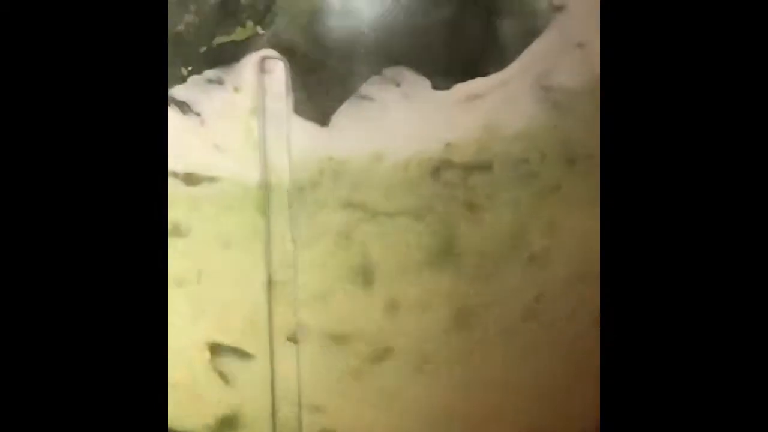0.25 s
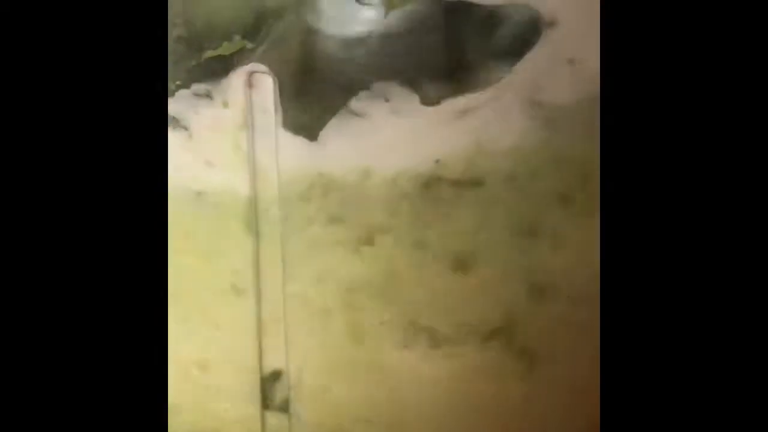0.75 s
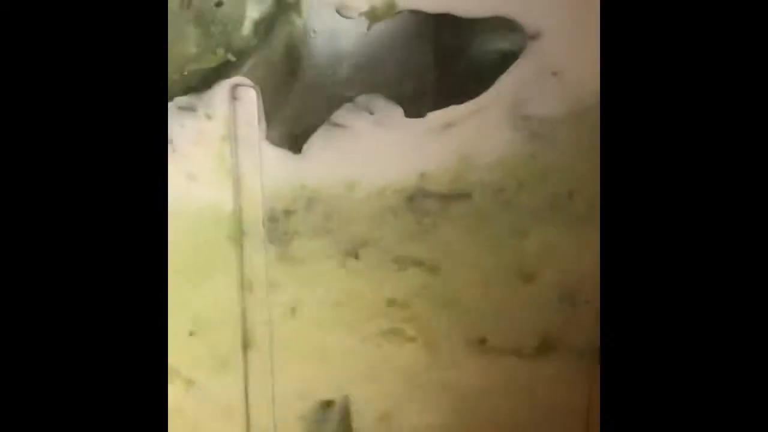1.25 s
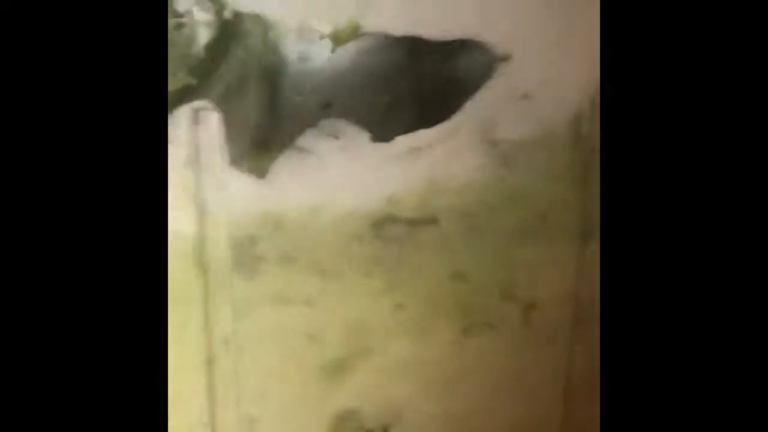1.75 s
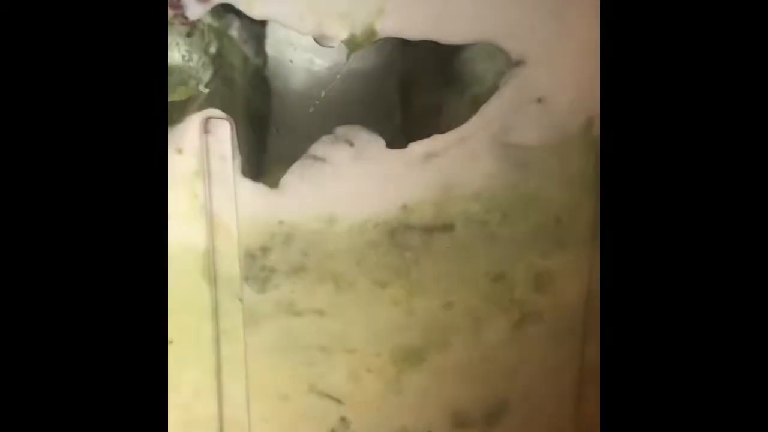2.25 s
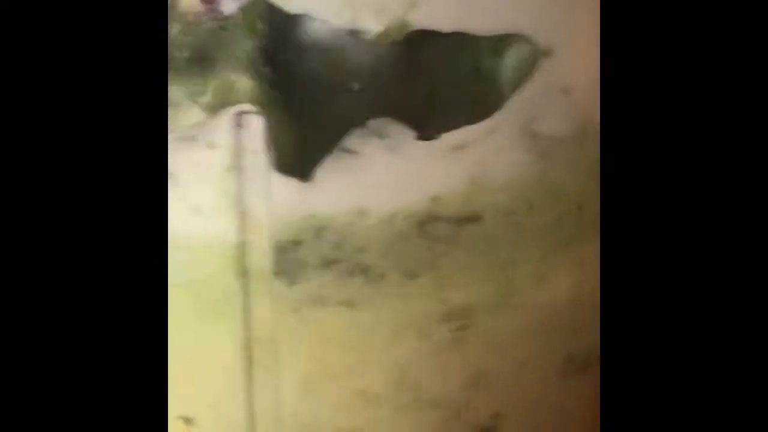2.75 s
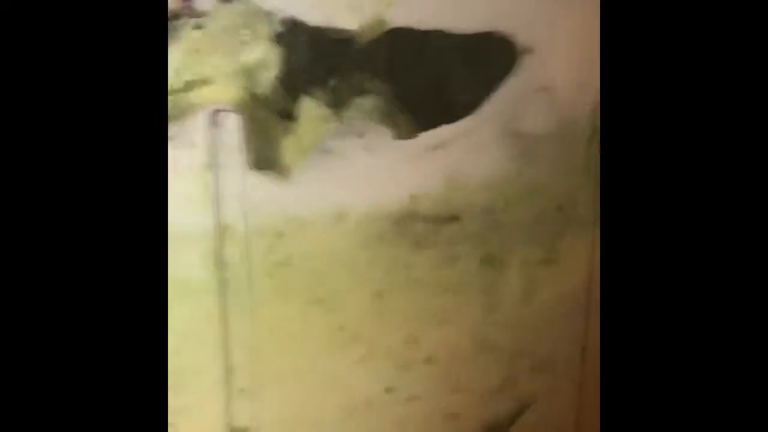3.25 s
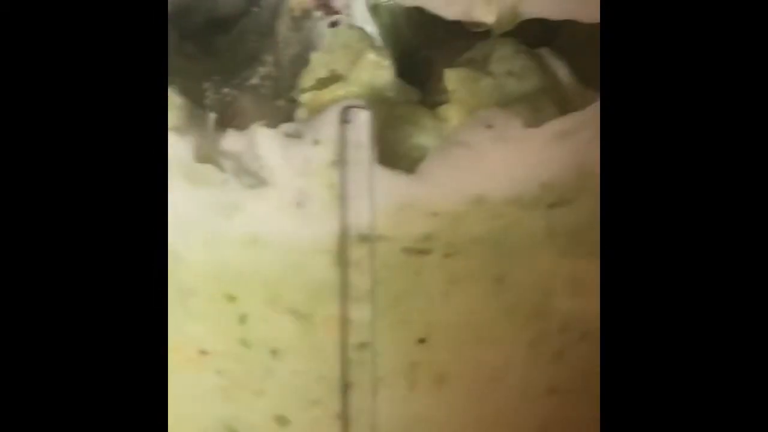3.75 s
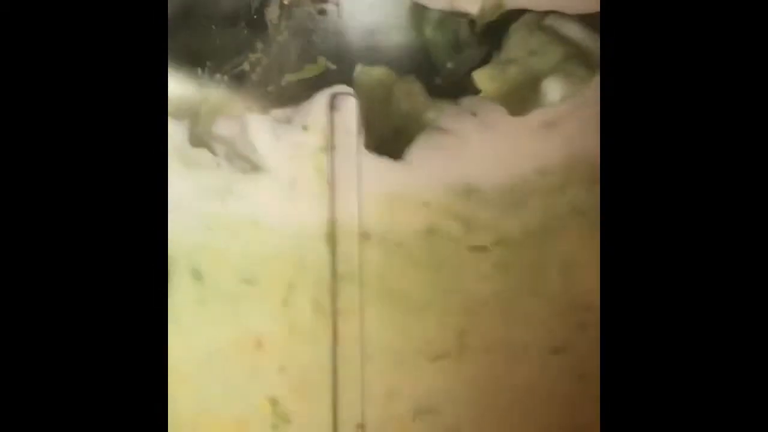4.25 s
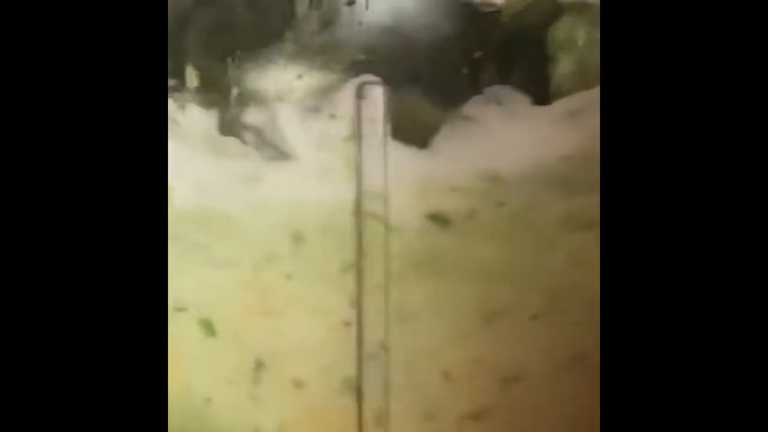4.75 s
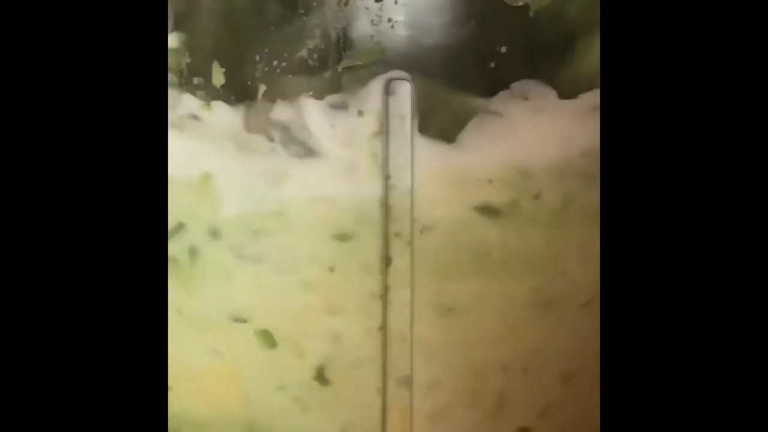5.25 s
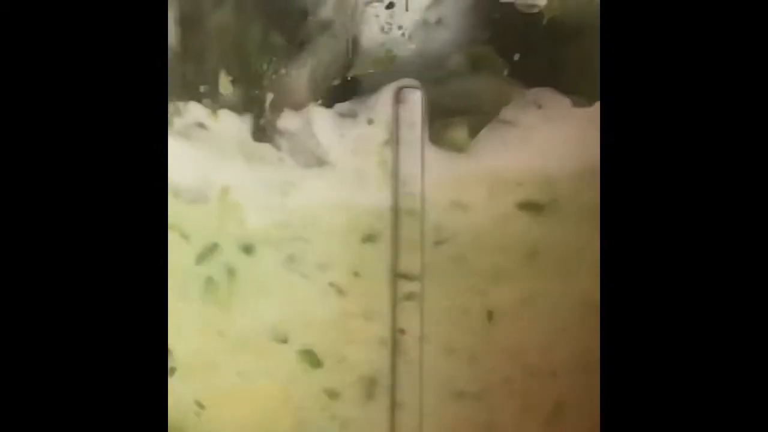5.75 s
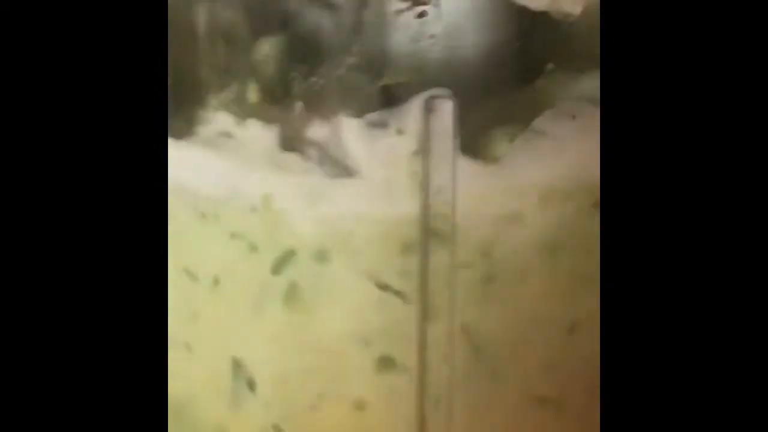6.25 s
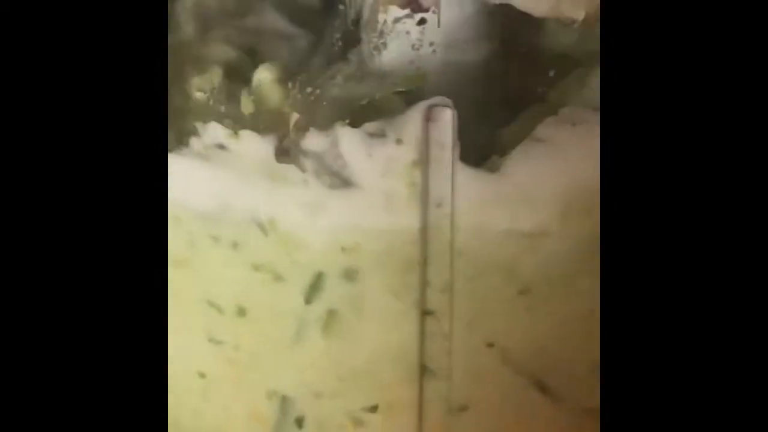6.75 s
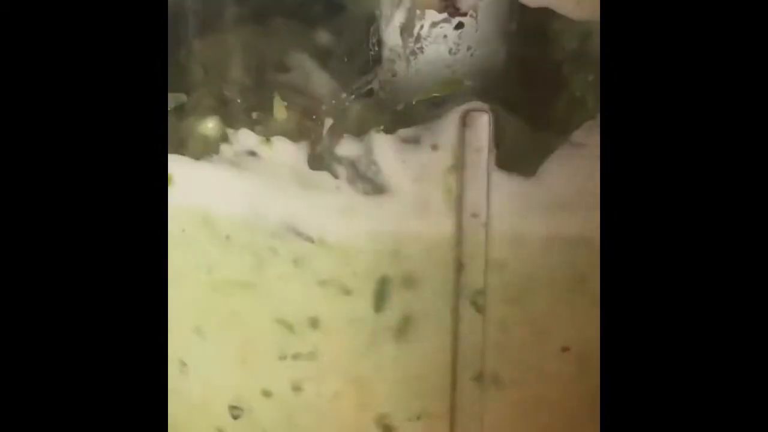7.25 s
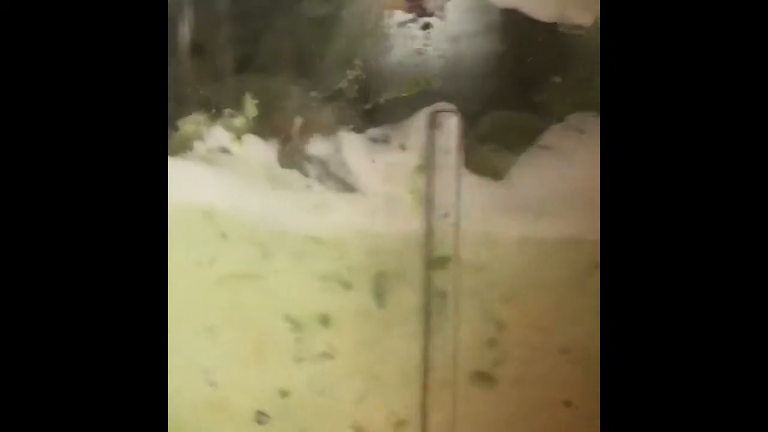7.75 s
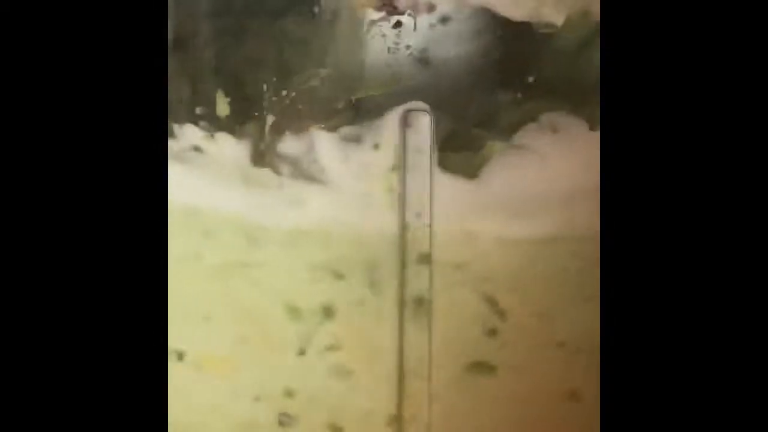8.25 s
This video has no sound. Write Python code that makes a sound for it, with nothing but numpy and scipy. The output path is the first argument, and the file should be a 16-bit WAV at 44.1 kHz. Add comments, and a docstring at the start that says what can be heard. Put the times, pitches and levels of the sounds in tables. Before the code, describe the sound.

Fast, hard plastic ratchet bursts from a pull-cord chopper repeat over wet sloshing puree, with knocks, bowl thumps and small ticks between pulls, close up.

```python
"""A hand-held pull-cord chopper whips a herb puree in a plastic bowl, close by in a kitchen.
It starts in mid-pull: a slowing run of hard ratchet clicks over a wet rush of food and a scraping cord.
As each surge ends the spool knocks, the bowl thumps and sometimes thuds on the counter; before the next
run come the clutch's double tick and the cord snapping taut. Stray bits of food tick later on, and
a faint low hum passes near the end. Filtered noise bursts make the contacts, noise and pops the food."""
import sys
import numpy as np
from scipy import signal
from scipy.fft import rfft, irfft
from scipy.io import wavfile

SR = 44100
rng = np.random.default_rng(int(sys.argv[2]) if len(sys.argv) > 2 else 0)


def unload_audio(sound):
    """Save the sound as a 16-bit wav file, at the path given as the first command line argument."""
    columns = np.transpose(np.atleast_2d(sound))
    # keep every value between -1 and 1, then stretch to whole-number steps
    steps = np.round(np.clip(columns, -1, 1) * 32767)
    wavfile.write(sys.argv[1], SR, steps.astype(np.int16))


N = 375519
TIME = np.arange(N) / SR
HIT = np.arange(2048) / SR   # time within one contact, s
LONG_HIT = np.arange(SR // 5) / SR   # time within one knock, thump or thud, s


def from_db(db):
    """Decibels to gain."""
    return 10 ** (np.asarray(db) / 20)


def rms_one(x):
    """Scale to unit rms."""
    return x / np.sqrt(np.mean(x ** 2) + 1e-20)


def start_rms_one(x):
    """Scale to unit rms over the first 7 ms."""
    return x / np.sqrt(np.mean(x[:int(.007 * SR)] ** 2))


def curve(rows, t):
    """Read a two-column table along straight lines."""
    return np.interp(t, *np.transpose(rows))


def cut(x, hz, kind, order=2):
    """Butterworth filter."""
    return signal.sosfilt(signal.butter(order, hz, kind, fs=SR, output="sos"), x)


def resonance(x, hz, width_hz):
    """Two-pole resonance with gain 1 on top."""
    r = np.exp(-np.pi * width_hz / SR)
    feedback = [1, -2 * r * np.cos(2 * np.pi * hz / SR), r * r]
    return signal.lfilter(np.array([1, 0, -1]) * (1 - r * r) / 2, feedback, x)


def coloured(x, colour):
    """Give a noise a smooth spectrum, drawn over log frequency; rms 1."""
    hz, db = np.transpose(colour)
    grid = np.maximum(np.fft.rfftfreq(len(x), 1 / SR), 1)
    gain = from_db(np.interp(np.log(grid), np.log(hz), db))
    return rms_one(irfft(rfft(x) * gain, len(x)))


def add(out, s, sound):
    """Mix a sound in at time s; one that would start before 0 is left out."""
    at = int(s * SR)
    if 0 <= at < N:
        out[at:at + len(sound)] += sound[:N - at]


def contact(rise_s, snap_t60, rattle_db, rattle_t60, rattle_hz, grain_db):
    """Force of one contact: a hard snap, then a duller, fading chatter of the loose parts."""
    noise = rng.standard_normal((2, len(HIT)))
    grains = noise * from_db(grain_db * rng.standard_normal((2, len(HIT))))
    snap = rms_one(grains[0] * (1 - np.exp(-HIT / rise_s)) * from_db(-60 * HIT / snap_t60))
    chatter = cut(grains[1], rattle_hz, "low", order=1)
    chatter_rise = 1 - np.exp(-HIT / snap_t60 * 10)
    rattle = rms_one(chatter * chatter_rise * from_db(-60 * HIT / rattle_t60))
    return snap + from_db(rattle_db) * rattle


# resonances of the plastic lid and bowl: f/Hz, width/Hz, level/dB (f and level then vary a little per hit)
PLASTIC_MODES = [(311, 48.3, -1), (530.7, 65, -0.5), (661, 106, -0.5), (887, 150, 3.5), (1157, 205, 1.5),
                 (1278, 164, 1.5), (1738, 300, -2.5), (2033, 138, 2.5), (2420, 214, -1.5),
                 (2763, 225, -0.5), (3426, 490, 3), (3897, 365, 2.5), (5054, 650, -3.5), (6020, 770, -5),
                 (6510, 700, -6.5), (9620, 2930, -15), (15400, 1050, -25)]
# the pawl's ring wanders from pull to pull: t/s, f/Hz (only its ratio to the resting note is used)
PAWL_RING = [(0, 3640), (1.6, 3610), (3.1, 3535), (5, 3605), (6.5, 3564), (7.5, 3600), (8.4, 3620)]
PAWL_REST_HZ, PAWL_MODES_ABOVE_HZ = 3600, 3000


def strike(force, s, bright_db, split_hz=1900, low_hz=150, variety_db=1.0,
           bowl_hz=180, bowl_width_hz=60, bowl_db=-9):
    """A force rings every note of the plastic, each a bit differently; bright_db lifts its treble."""
    dull = cut(force, split_hz, "low", order=1)
    force = dull + from_db(bright_db) * (force - dull)
    shift = curve(PAWL_RING, s) / PAWL_REST_HZ * (1 + .022 * rng.standard_normal())
    luck = variety_db * rng.standard_normal(len(PLASTIC_MODES))
    ring = 0
    for k, (hz, width_hz, db) in enumerate(PLASTIC_MODES):
        note_hz = hz * shift if hz > PAWL_MODES_ABOVE_HZ else hz
        ring = ring + (-1) ** k * from_db(db + luck[k]) * resonance(force, note_hz, width_hz)
    ring = ring + from_db(bowl_db) * resonance(force, bowl_hz, bowl_width_hz)   # the filled bowl as a whole
    return start_rms_one(cut(ring, low_hz, "high"))   # so small a body radiates little bass


# one pull of the cord: first click t/s, teeth in the run, top speed/(teeth per s), slowing (0-1),
# level/dB, brightness/dB, wait for one more tooth/s, its level/dB,
# clutch catches earlier by/s, clutch level/dB (all levels before the mix trims in ratchet and clutch)
CORD_PULLS = [(-0.0173, 6, 116.1, 0.08, -13.5, -2.5, 0.0328, -16.5, 0.031, -28),
              (0.2142, 6, 110, 0.06, -13.3, 4, 0.037, -17, 0.033, -27.5),
              (0.4449, 7, 115, 0.06, -13.5, 1.5, 0.026, -20, 0.027, -30),
              (0.6778, 6, 101, 0.07, -13, -1.5, 0.021, -22, 0.034, -31),
              (0.9008, 6, 104, 0.04, -13, 1.5, 0.031, -17.5, 0.045, -25.5),
              (1.1313, 6, 104, 0.06, -12.5, -0.5, 0.032, -20.5, 0.031, -25.5),
              (1.3696, 5, 94, 0.24, -13, -0.5, 0.018, -20.5, 0.02, -30),
              (1.6155, 6, 88, 0.06, -14, 1, 0.035, -20.5, 0.046, -27),
              (1.9131, 7, 99, 0.06, -12.5, 5.5, 0.0376, -24.5, 0.045, -26.5),
              (2.2469, 7, 91, 0.03, -13.5, 1.5, 0.032, -16, 0.053, -29),
              (2.6393, 7, 91.5, 0.03, -12.5, 5.5, 0.026, -13, 0.047, -28),
              (3.0308, 7, 84, 0.02, -13.8, 4.5, 0.056, -19, 0.035, -22.5),
              (3.4011, 6, 82.2, 0.02, -13.5, 2, 0.062, -20, 0.045, -25),
              (3.763, 6, 74.3, 0.02, -13, 7, 0.029, -14.5, 0.075, -29.5),
              (4.1689, 7, 77.3, 0.03, -13.5, 1, 0.05, -23, 0.044, -22.5),
              (4.5577, 7, 85.7, 0.04, -14, 1.5, 0.053, -21.5, 0.052, -26.5),
              (4.9488, 7, 86.4, 0.04, -12.5, 4.5, 0.055, -20.5, 0.046, -25.5),
              (5.338, 6, 87.3, 0.03, -14, 2.5, 0.028, -16, 0.058, -29),
              (5.7458, 6, 82.3, 0.1, -13, 6, 0.042, -24, 0.066, -27.5),
              (6.1286, 6, 74.3, 0.06, -13, 6, 0.0431, -20, 0.054, -24),
              (6.5218, 5, 76, 0.07, -12.5, 7.5, 0.077, -18, 0.047, -23.5),
              (6.9172, 8, 84.7, 0.03, -13, 3.5, 0.059, -26, 0.053, -26),
              (7.3883, 7, 83.3, 0.059, -12.5, 5, 0.0418, -12.5, 0.058, -27),
              (7.8903, 5, 77.2, 0.174, -12.5, 4, 0.083, -21.5, 0.069, -25),
              (8.2984, 7, 80.2, 0.052, -13.4, 1, 0.072, -19.5, 0.071, -26)]


def teeth(first_db=0.4, run_fade_db=0.6, spread_db=1.0, colour_spread_db=2, last_dulling=1.4):
    """Clicks of all pulls as (s, level dB, brightness dB): the hand is fastest from the second tooth
    to the third, then the gaps grow with the square of the count; one last tooth slips over late."""
    clicks = []
    for s, count, top_speed, slowing, db, bright_db, wait_s, last_db, _, _ in CORD_PULLS:
        k = np.arange(round(count))
        gaps = (1 + slowing * (k[:-1] - 1) ** 2) / top_speed
        times = s + np.append(0, np.cumsum(gaps))
        luck = rng.standard_normal((len(k), 2))   # no two teeth snap alike
        jerk = first_db * (k == 0)   # the first tooth takes the jerk
        fade = run_fade_db * k / k[-1]   # loss over the run as the hand slows
        levels = db + jerk - fade + spread_db * luck[:, 0]
        clicks += zip(times, levels, bright_db + colour_spread_db * luck[:, 1])
        last_bright_db = bright_db + last_dulling * (last_db - db)   # a softer last tooth is duller
        clicks.append((times[-1] + wait_s, last_db, last_bright_db))
    return clicks


def ratchet(ride_s=0.0019, ride_db=-19, seat_s=0.000703, seat_db=-1, easing_below_db=-15,
            easing_range_db=6, eased_rise_s=.002, eased_t60=.006):
    """The pawl rides up each tooth, snaps over and seats with a sharp blow; on a weak tooth it eases over."""
    snaps, rides = np.zeros(N), np.zeros(N)
    for s, db, bright_db in teeth():
        ease = np.clip((easing_below_db - db) / easing_range_db, 0, 1)
        force = contact(rise_s=0.00015 + ease * eased_rise_s, snap_t60=0.011 + ease * eased_t60,
                        rattle_db=-0.5, rattle_t60=0.034, rattle_hz=5530, grain_db=2.0)
        blow_s = seat_s * rng.uniform(.5, 1.5)
        blow = rms_one(np.exp(-((HIT - blow_s) / 3e-5) ** 2))
        force = force + (1 - ease) * from_db(seat_db) * blow
        add(snaps, s, from_db(db) * strike(force, s, bright_db))
        scrape = rng.standard_normal(len(HIT)) * np.exp(-HIT / ride_s)
        add(rides, s - ride_s, from_db(db + ride_db) * strike(scrape, s, bright_db=-9.5))
    return from_db(0.92) * (snaps + rides)


# the puree surges while the cord winds back: spool stops t/s, surge level/dB, surge build-up/s,
# knock of the stop level/dB, thump of the bowl level/dB (levels before each sound's own mix trim)
CORD_RETURNS = [(0.121, -26, 0.029, -33, -27), (0.360, -25, 0.026, -34, -27.5),
                (0.601, -27.5, 0.049, -29, -28.5), (0.805, -25.5, 0.014, -34, -33.5),
                (1.049, -28, 0.043, -30, -27), (1.267, -26, 0.012, -39, -41), (1.502, -27, 0.012, -44, -34),
                (1.797, -30.5, 0.066, -34, -31.5), (2.134, -33.5, 0.079, -39, -33.5),
                (2.515, -30, 0.041, -36, -33), (2.911, -32, 0.06, -26, -30),
                (3.260, -28, 0.031, -28.5, -30), (3.609, -33.5, 0.03, -48, -43),
                (4.004, -25, 0.021, -22, -22.5), (4.421, -35, 0.064, -42, -33),
                (4.811, -29.5, 0.039, -33.5, -27), (5.208, -34, 0.068, -37, -38),
                (5.608, -35.5, 0.053, -38, -31), (5.991, -36.5, 0.072, -35, -31.5),
                (6.359, -32.5, 0.034, -29.5, -27), (6.762, -35, 0.036, -41, -35),
                (7.217, -33.5, 0.09, -36, -29.5), (7.714, -33.5, 0.066, -35, -30),
                (8.149, -37, 0.033, -40, -40), (8.6, -36, 0.03, -36, -36)]


def flow(coast_db=-46, stall_s=0.011, rest_db=-62):
    """Strength of the stirring: blades spin from the first click, the puree surges, then it nearly stalls."""
    out = np.zeros(N)
    for (first_s, *_), (stop_s, db, build_s, _, _) in zip(CORD_PULLS, CORD_RETURNS):
        start = max(first_s, 0)
        t = start - stop_s + np.arange(SR * 3 // 5) / SR   # 0 at the height of the surge
        surge = from_db(db) * np.exp(np.minimum(t, 0) / build_s)
        stall = np.exp(-np.maximum(t, 0) / stall_s)
        add(out, start, np.hypot(from_db(coast_db), surge) * stall)
    return out + from_db(rest_db)


def pops(per_s, low_hz, high_hz, cycles, spread_db):
    """Random wet pops: impulses ring 16 pitches, a few much larger than the rest."""
    pitches = np.geomspace(low_hz, high_hz, num=16)
    loudness = from_db(spread_db * np.minimum(rng.exponential(1, N), 4))
    sizes = loudness * rng.choice([-1, 1], N)
    born = rng.random(N) < per_s / SR
    dealt = rng.integers(0, len(pitches), N)   # which pitch each pop gets
    return sum(resonance(sizes * born * (dealt == k) + 1e-18, hz, hz / cycles)
               for k, hz in enumerate(pitches))


# colour of the churning: f/Hz, level/dB (density per Hz, relative)
CHURN_SPECTRUM = [(90, -21), (170, 4), (240, 1.5), (320, 0), (500, -2), (750, 0.5), (1300, -8), (1700, -13),
                  (2400, -13.5), (3600, -14), (6000, -20), (15000, -30)]


def churn(drop_share=0.49, spatter_db=-16, lumps_db=-7):
    """Blades tear through the puree: a wet rush full of short pops, lumps slapping the wall, fine spatter."""
    rush = coloured(rng.standard_normal(N), CHURN_SPECTRUM)
    drops = pops(per_s=1100, low_hz=309.6, high_hz=4750, cycles=13.3, spread_db=4.5)
    gurgle = coloured(drops, CHURN_SPECTRUM)
    lumps = rms_one(pops(per_s=160, low_hz=600, high_hz=1900, cycles=7, spread_db=2))
    spatter = rms_one(pops(per_s=500, low_hz=2500, high_hz=11000, cycles=2.5, spread_db=3))
    wet = np.sqrt(1 - drop_share) * rush + np.sqrt(drop_share) * gurgle
    return from_db(0.5) * flow() * (wet + from_db(lumps_db) * lumps + from_db(spatter_db) * spatter)


SPOOL_HZ = 1700   # note of the cord spool


def rewind(slips_per_s=250, spread_db=4, width_hz=140, db=-14):
    """The cord scrapes back onto the spool in uneven random slips, which bring out the spool's note."""
    slips = (rng.random(N) < slips_per_s / SR) * from_db(spread_db * rng.standard_normal(N))
    return from_db(db) * flow() * rms_one(resonance(slips + 1e-18, SPOOL_HZ, width_hz))


# colour of the quiet background: f/Hz, level/dB (density per Hz, relative)
BACKGROUND_SPECTRUM = [(25, -21), (50, -3), (85, -5), (160, -4.5), (300, -11), (1000, -19), (4000, -28.5),
                       (15000, -52)]


def background(db=-52):
    """A steady, faint, mostly low noise."""
    return from_db(db) * coloured(rng.standard_normal(N), BACKGROUND_SPECTRUM)


# colour of the room's reflections: f/Hz, level/dB (relative)
ROOM_SPECTRUM = [(100, -36), (300, 9), (1000, 5), (2000, 3.5), (3600, -3.5), (7000, -2), (15000, 1.5)]


def kitchen(x, t60=0.23, treble_t60=0.24, treble_hz=4000, first_s=0.0071, wet_db=-17):
    """Dense reflections from counter and walls; lows and treble die away at nearly the same rate."""
    t = np.arange(SR // 2) / SR
    scatter = coloured(rng.standard_normal(len(t)), ROOM_SPECTRUM)
    low = cut(scatter, treble_hz, "low") * from_db(-60 * t / t60)
    high = cut(scatter, treble_hz, "high") * from_db(-60 * t / treble_t60)
    tail = (low - high) * (t > first_s)   # minus keeps the two bands from cancelling where they meet
    return from_db(wet_db) * signal.fftconvolve(x, tail / np.sqrt(np.sum(tail ** 2)))[:N]


def stops(width_hz=170, ring_db=-17, ring_t60=.17):
    """As each surge ends the spool reaches its stop with a short woody knock and rings on faintly."""
    out, t = np.zeros(N), LONG_HIT
    for s, _, _, db, _ in CORD_RETURNS:
        hz = SPOOL_HZ * rng.uniform(.95, 1.05)
        force = rng.standard_normal(len(t)) * np.exp(-t / .001)
        knock = start_rms_one(cut(resonance(force, hz, width_hz), 2 * hz, "low"))
        ring = np.sin(2 * np.pi * hz * t) * from_db(ring_db - 60 * t / ring_t60)
        add(out, s, from_db(db) * (knock + ring))
    return out


# stray bits of food flung against the wall: t/s, level/dB (before the wall's note is added),
# brightness/dB (before the dulling shared by all food ticks)
FOOD_TICKS = [(2.78, -24.5, -3), (3.897, -29.5, -3), (3.965, -34, -11), (5.464, -26.5, 4),
              (6.6405, -23.5, 0), (7.068, -26.5, 20), (7.571, -30.5, 7), (8.0239, -22.5, 10),
              (8.128, -33, 31)]


def ticks(wall_hz=1700, wall_width_hz=200, wall_db=-3, food_dulling_db=-10.5):
    """Softer, more scraping contacts that bring out the note of the bowl's wall:
    the handle coming home, the cord snapping taut before a pull, and stray bits of food."""
    home = [(s, knock_db - 3, -14.5) for s, _, _, knock_db, _ in CORD_RETURNS]
    taut = [(s - 0.021, -30.5, -28.5) for s, *_ in CORD_PULLS]   # 21 ms before the first click
    bounces = [(s + 0.008, -33.5, bright_db) for s, _, bright_db in taut]   # the cord settles
    food = [(s, db, bright_db + food_dulling_db) for s, db, bright_db in FOOD_TICKS]
    out = np.zeros(N)
    for s, db, bright_db in home + taut + bounces + food:
        force = contact(rise_s=0.00035, snap_t60=0.018, rattle_db=-8.5, rattle_t60=0.044,
                        rattle_hz=2840, grain_db=1)
        add(out, s, from_db(db) * strike(force, s, bright_db))
    return out + from_db(wall_db) * resonance(out, wall_hz, wall_width_hz)


def thumps(hz=145, late_s=.006, rise_s=0.0086, gain_db=-9.5, shudder_db=-5,
           low_hz=50, high_hz=190, sag_s=0.052):
    """Just after the spool stops the bowl rocks on its foot: a short sagging note with a dull shudder."""
    out, t = np.zeros(N), LONG_HIT
    swell = t / rise_s * np.exp(1 - t / rise_s)   # peaks at 1 after rise_s
    for s, *_, db in CORD_RETURNS:
        pitch = hz * rng.uniform(0.856, 1.15) * np.exp((rise_s - t) / sag_s)
        note = np.sqrt(2) * np.sin(2 * np.pi * np.cumsum(pitch) / SR)
        shudder = rms_one(cut(rng.standard_normal(len(t)), [low_hz, high_hz], "band"))
        add(out, s + late_s, from_db(db + gain_db) * (note + from_db(shudder_db) * shudder) * swell)
    return out


# after the roughest strokes the bowl's foot lands back on the counter: t/s, level/dB (before the mix trim)
FOOT_LANDINGS = [(0.14, -34), (0.38, -41), (0.615, -40), (1.065, -34), (1.81, -44), (2.925, -42),
                 (3.28, -37), (4.015, -31), (6.375, -44)]


def landings(hz=70, rise_s=.003, t60=0.1, gain_db=1):
    """The soft foot meets the counter with a deep, short thud: a low sine that fades fast."""
    out, t = np.zeros(N), LONG_HIT
    thud = np.sin(2 * np.pi * hz * t) * (1 - np.exp(-t / rise_s)) * from_db(-60 * t / t60)
    for s, db in FOOT_LANDINGS:
        add(out, s, from_db(db + gain_db) * thud)
    return out


def clutch(lead_s=.01, lead_db=-9, bright_db=3, low_hz=950, dog_hz=1950, dog_width_hz=350, dog_db=3):
    """The two catches (dogs) of the clutch drop in one after the other: a thin double tick with its own note."""
    out = np.zeros(N)
    for start, *_, early_s, db in CORD_PULLS:
        s = start - early_s
        lead = (s - lead_s * rng.uniform(0.95, 1.2), db + lead_db)
        for at, level_db in (lead, (s, db)):
            force = contact(rise_s=0.0004, snap_t60=0.007, rattle_db=-2, rattle_t60=0.034,
                            rattle_hz=4000, grain_db=3.0)
            add(out, at, from_db(level_db) * strike(force, at, bright_db))
    out = out + from_db(dog_db) * resonance(out, dog_hz, dog_width_hz)
    return from_db(-5.5) * cut(out, low_hz, "high")


def hum(start_s=7.53, end_s=8.0, hz=75, db=-55, fade_s=.05):
    """A faint low hum, a plain sine, comes and goes once."""
    gate = np.clip(np.minimum(TIME - start_s, end_s - TIME) / fade_s, 0, 1)
    return from_db(db) * np.sqrt(2) * gate * np.sin(2 * np.pi * hz * TIME)


def scene():
    """The chopper, its room, a faint background and the hum."""
    chopper = ratchet() + churn() + rewind() + stops() + ticks() + thumps() + landings() + clutch()
    return (chopper + kitchen(chopper) + background() + hum())[None]


def record(dry, top=1.0, low_hz=42, cutoff_hz=15900):
    """The microphone drops the deepest bass, the loudest clicks are rounded off and the top is cut."""
    lean = cut(dry, low_hz, "high", order=4)
    rounded = lean / (1 + (lean / top) ** 6) ** (1 / 6)
    return signal.sosfilt(signal.ellip(10, .1, 70, cutoff_hz, fs=SR, output="sos"), rounded)


dry = scene()
out = record(dry)
unload_audio(out)
```